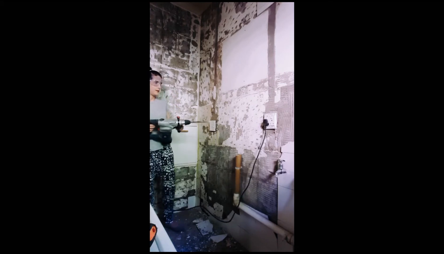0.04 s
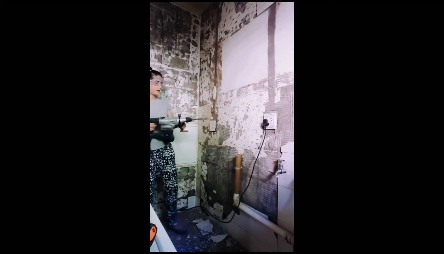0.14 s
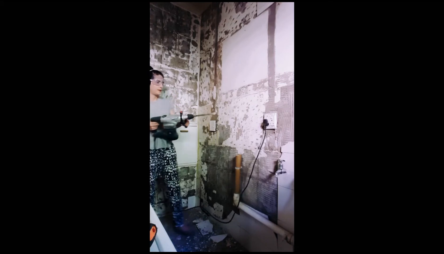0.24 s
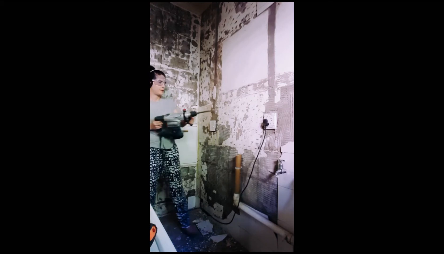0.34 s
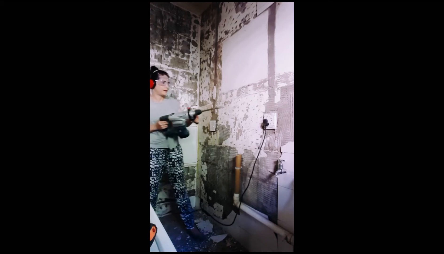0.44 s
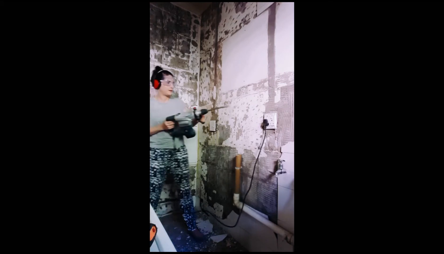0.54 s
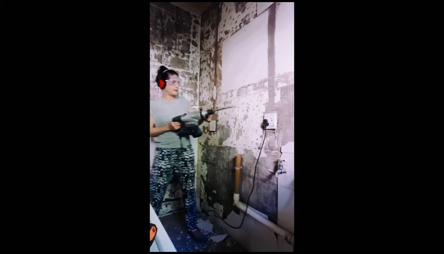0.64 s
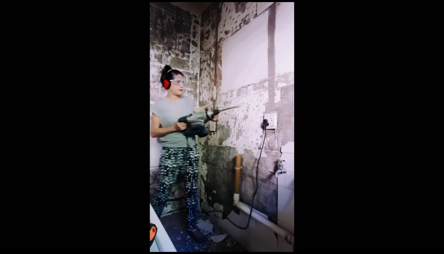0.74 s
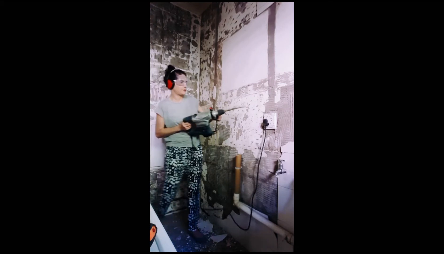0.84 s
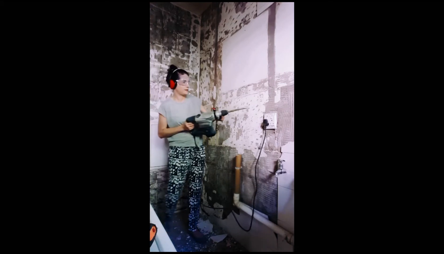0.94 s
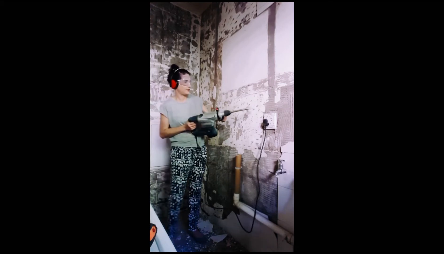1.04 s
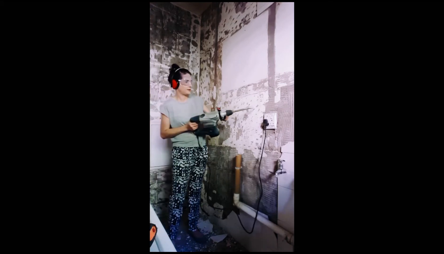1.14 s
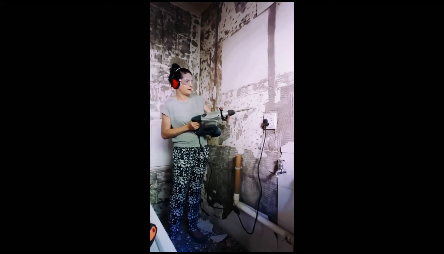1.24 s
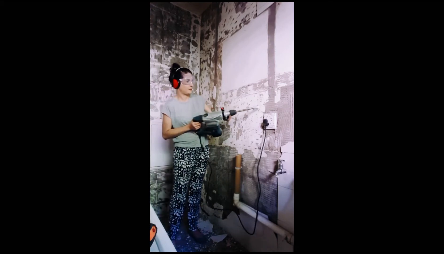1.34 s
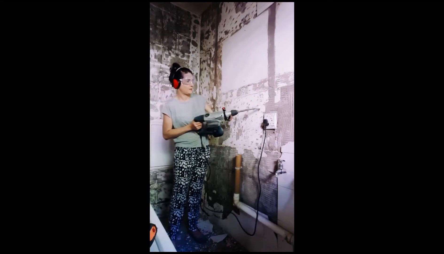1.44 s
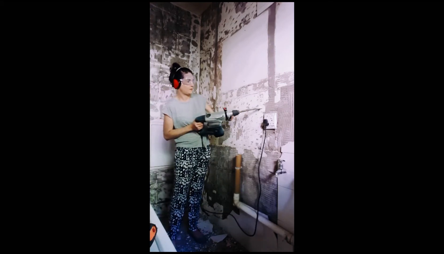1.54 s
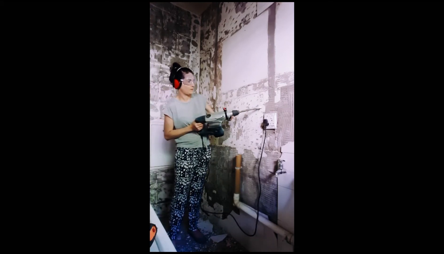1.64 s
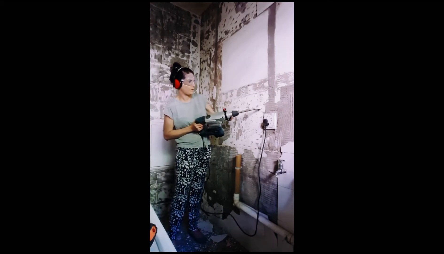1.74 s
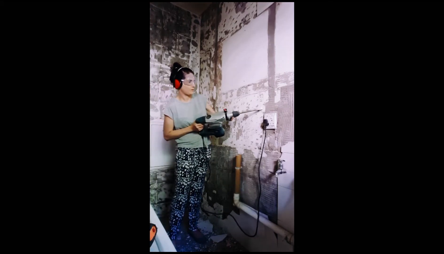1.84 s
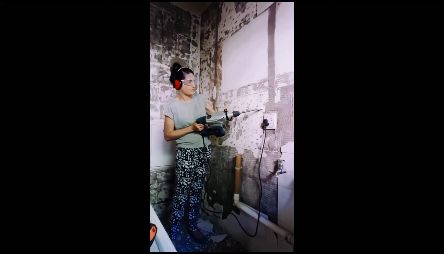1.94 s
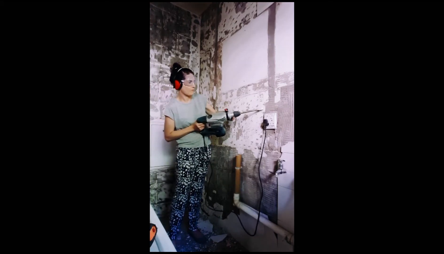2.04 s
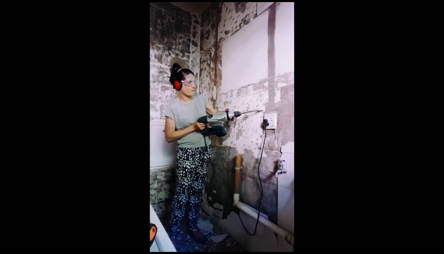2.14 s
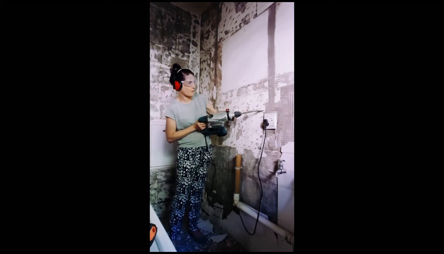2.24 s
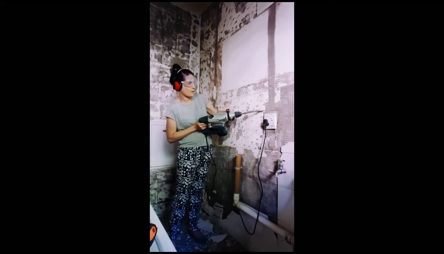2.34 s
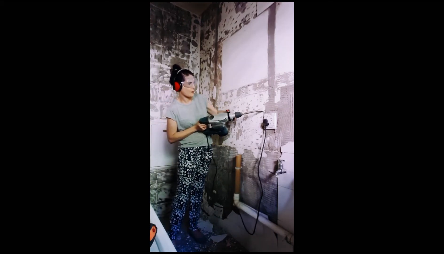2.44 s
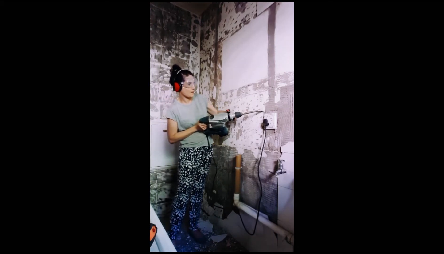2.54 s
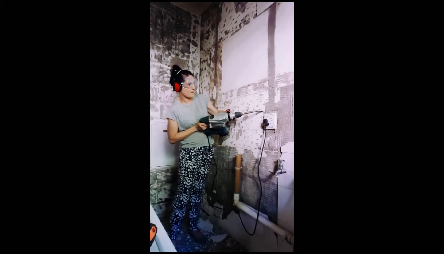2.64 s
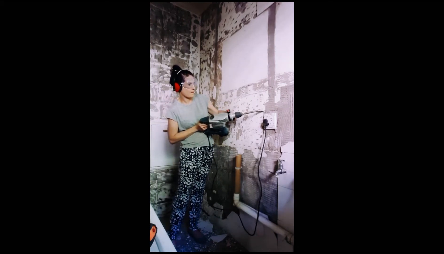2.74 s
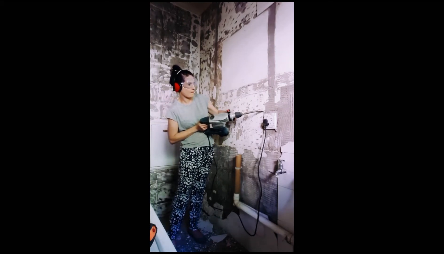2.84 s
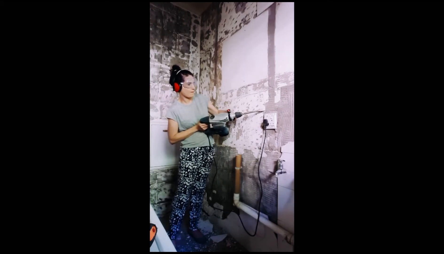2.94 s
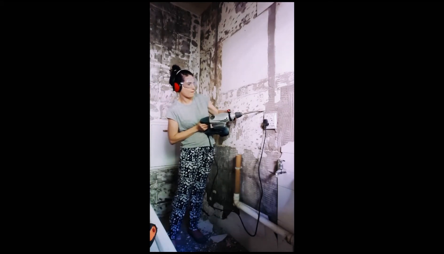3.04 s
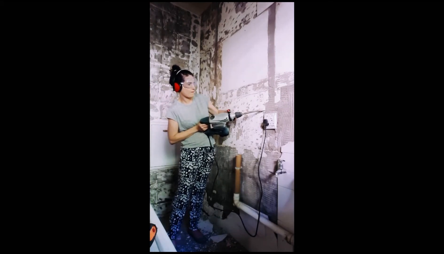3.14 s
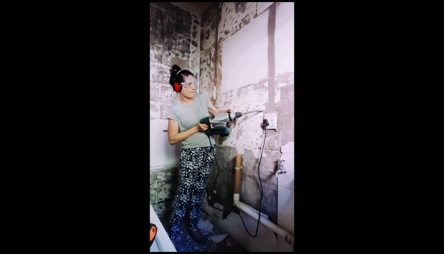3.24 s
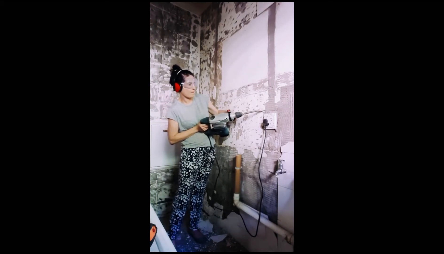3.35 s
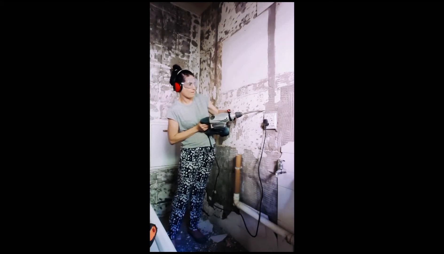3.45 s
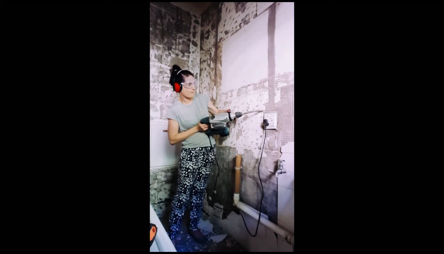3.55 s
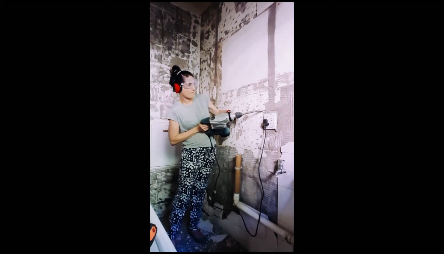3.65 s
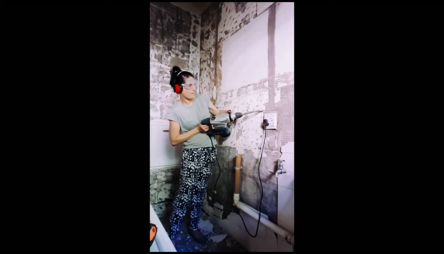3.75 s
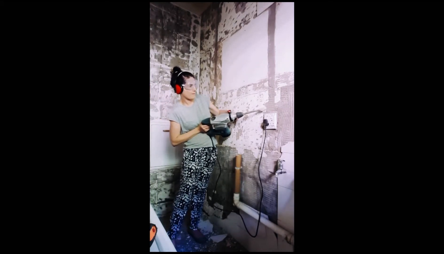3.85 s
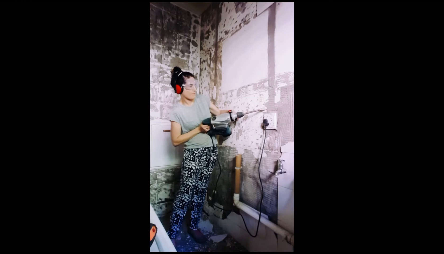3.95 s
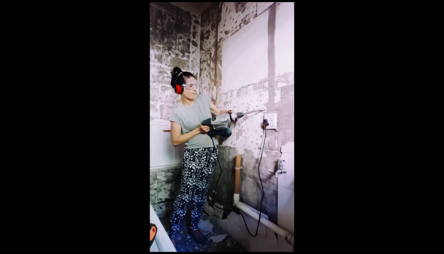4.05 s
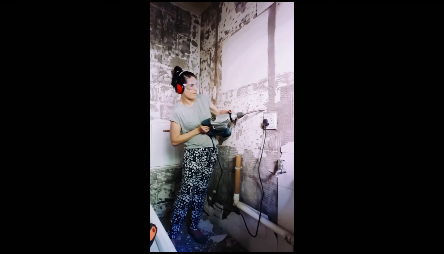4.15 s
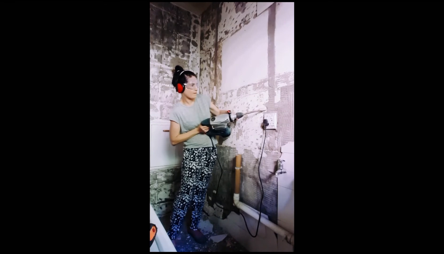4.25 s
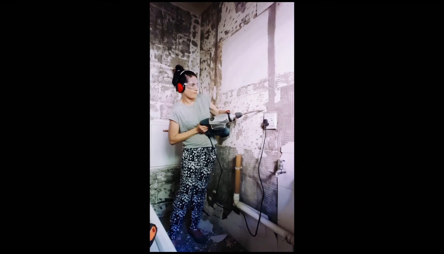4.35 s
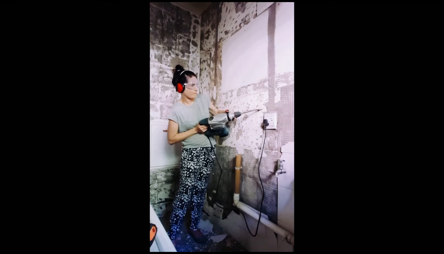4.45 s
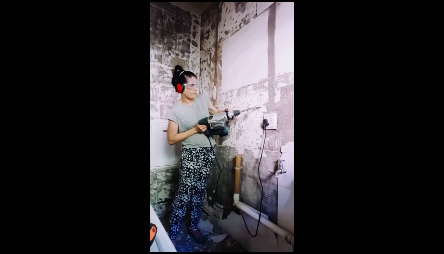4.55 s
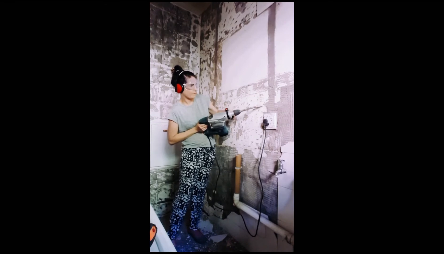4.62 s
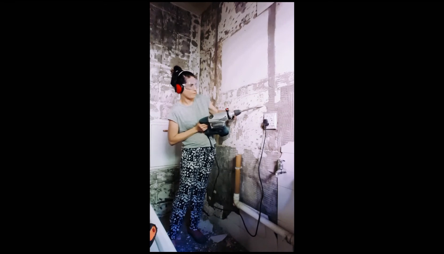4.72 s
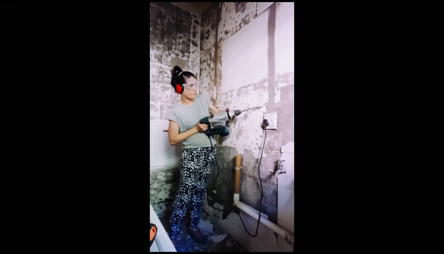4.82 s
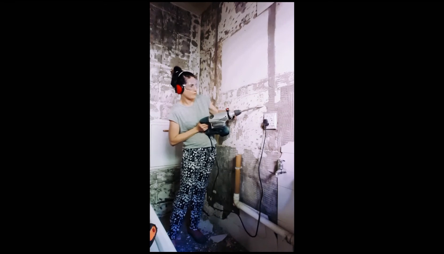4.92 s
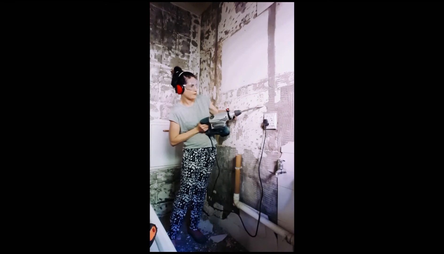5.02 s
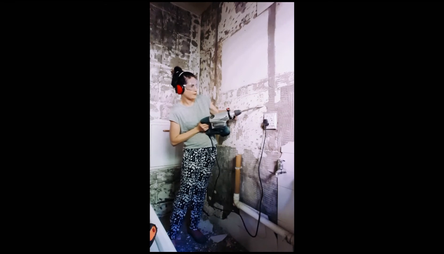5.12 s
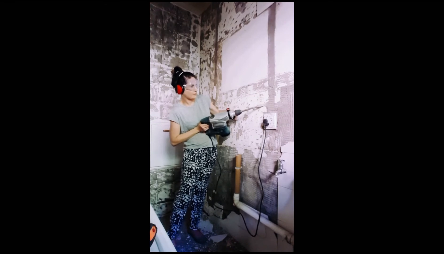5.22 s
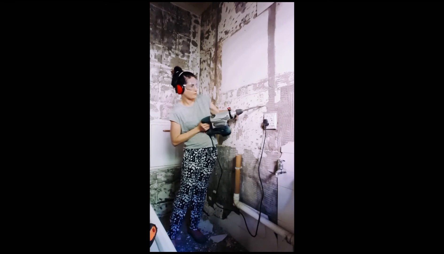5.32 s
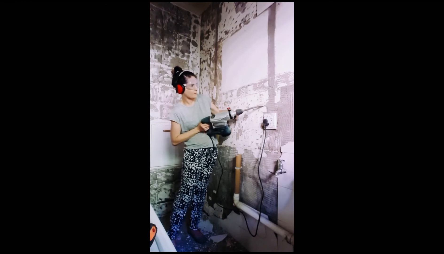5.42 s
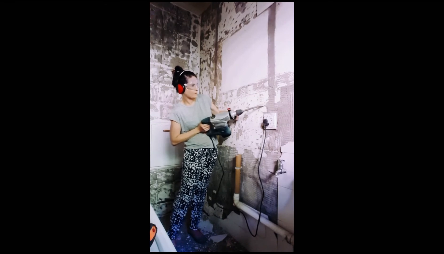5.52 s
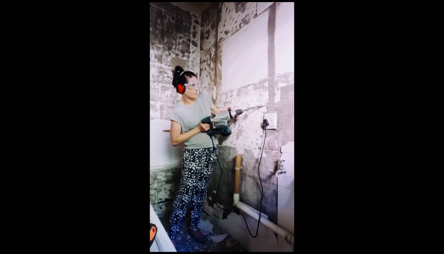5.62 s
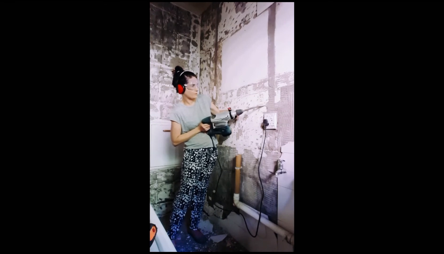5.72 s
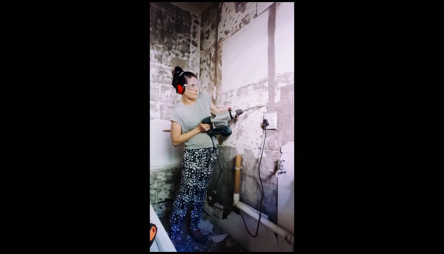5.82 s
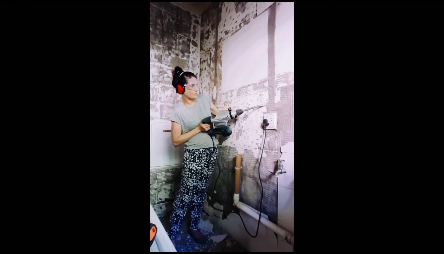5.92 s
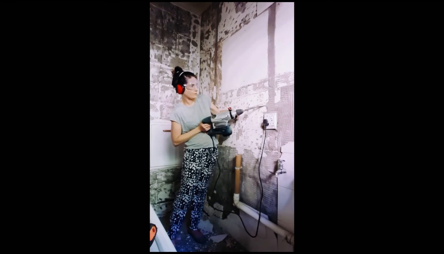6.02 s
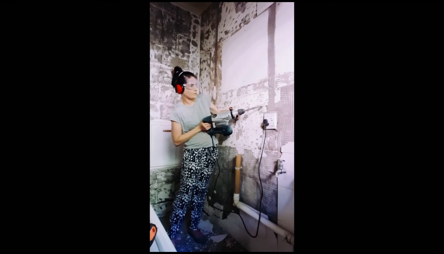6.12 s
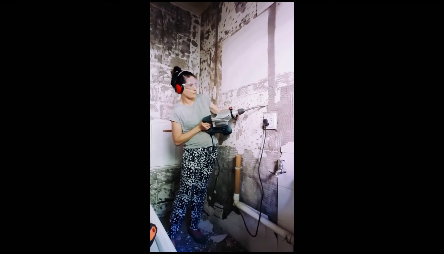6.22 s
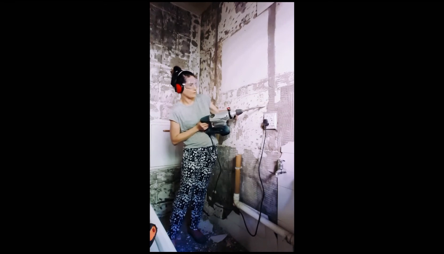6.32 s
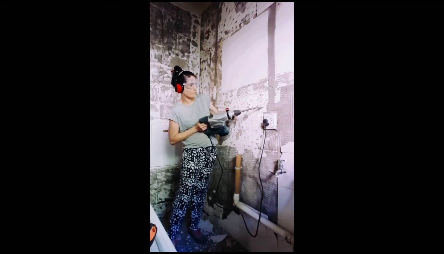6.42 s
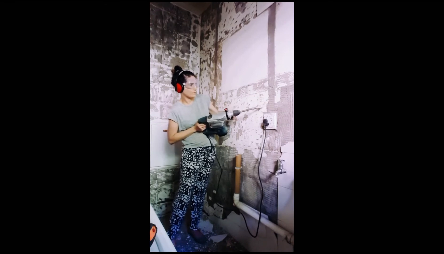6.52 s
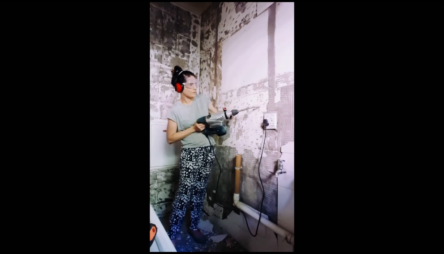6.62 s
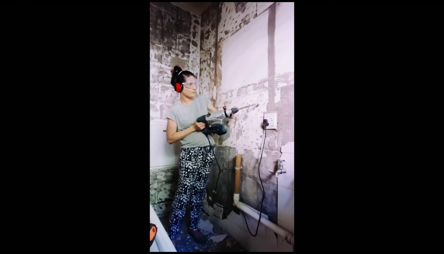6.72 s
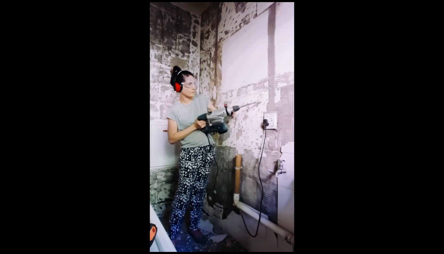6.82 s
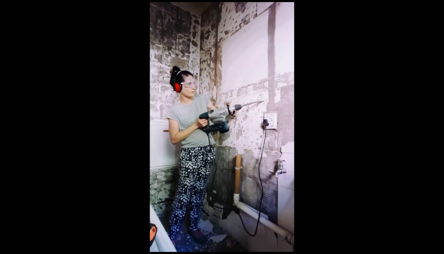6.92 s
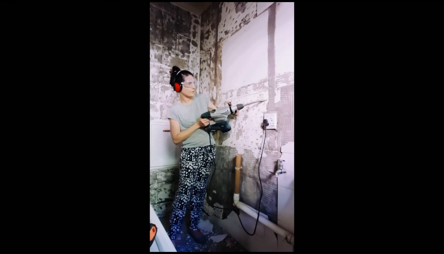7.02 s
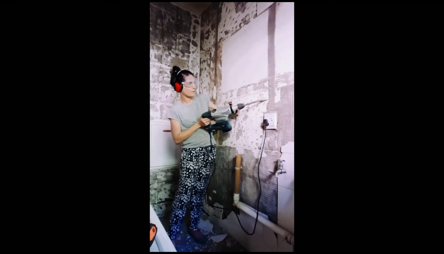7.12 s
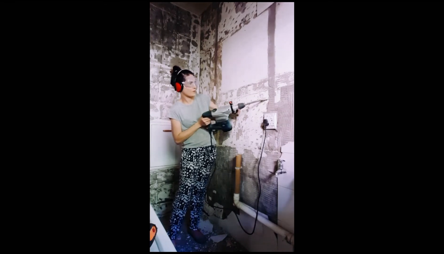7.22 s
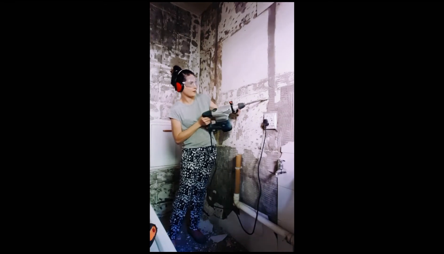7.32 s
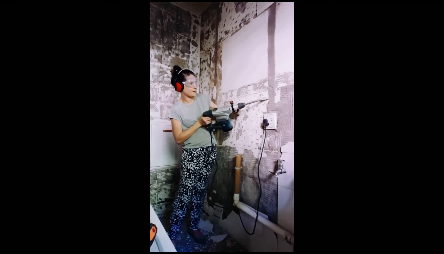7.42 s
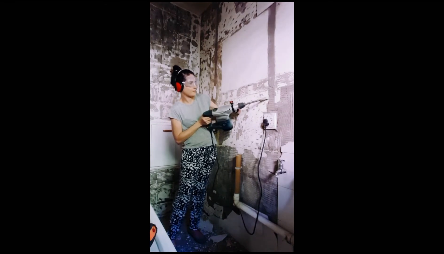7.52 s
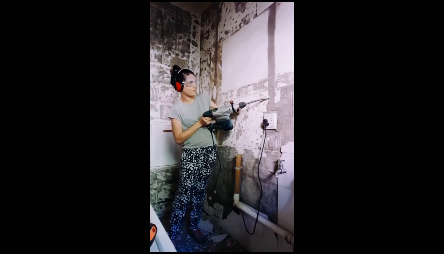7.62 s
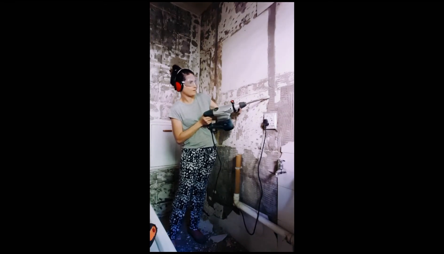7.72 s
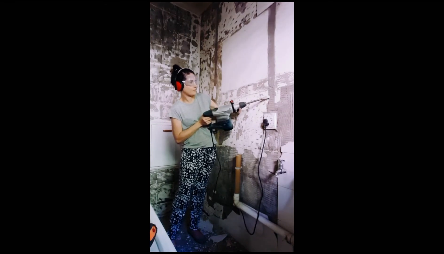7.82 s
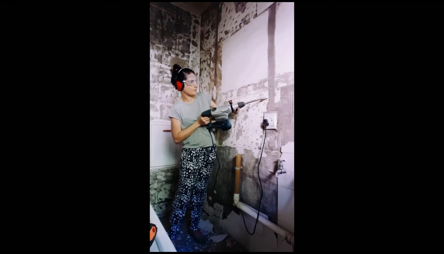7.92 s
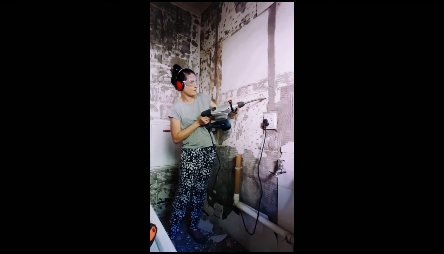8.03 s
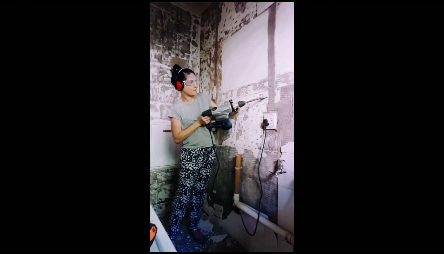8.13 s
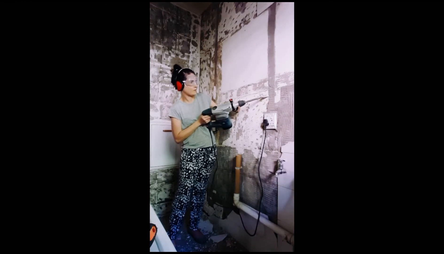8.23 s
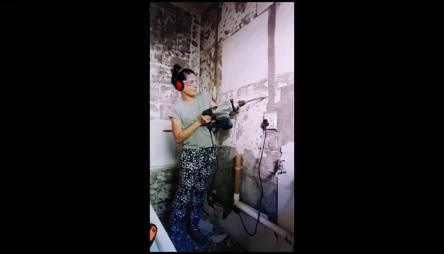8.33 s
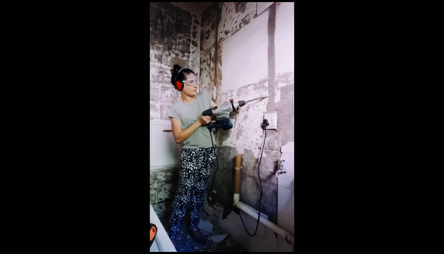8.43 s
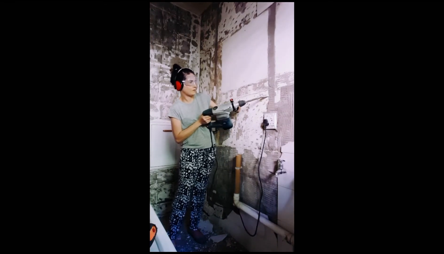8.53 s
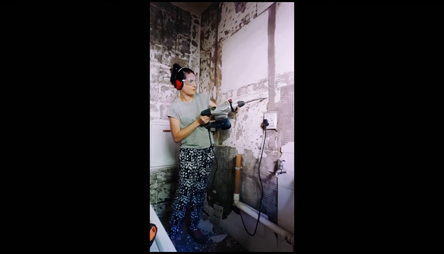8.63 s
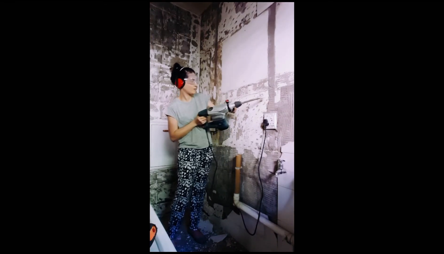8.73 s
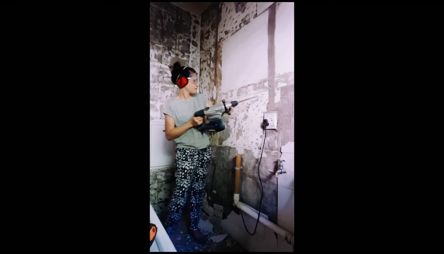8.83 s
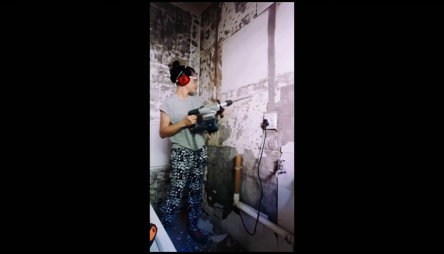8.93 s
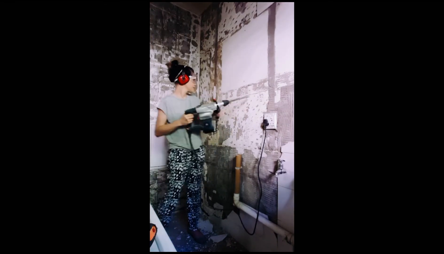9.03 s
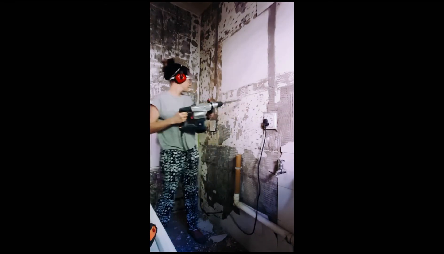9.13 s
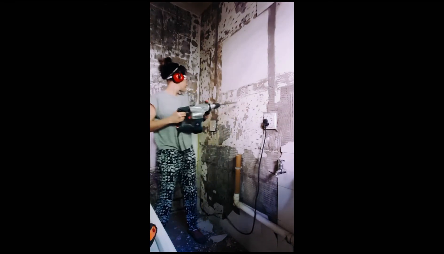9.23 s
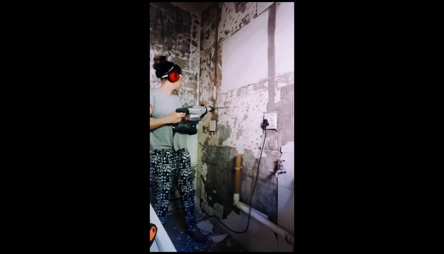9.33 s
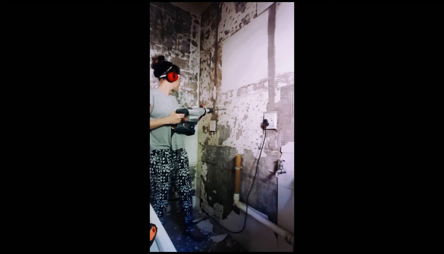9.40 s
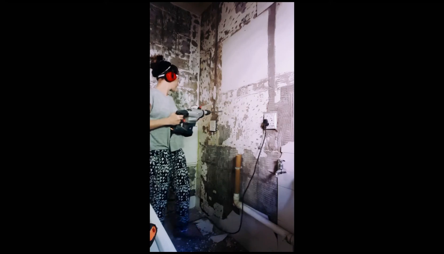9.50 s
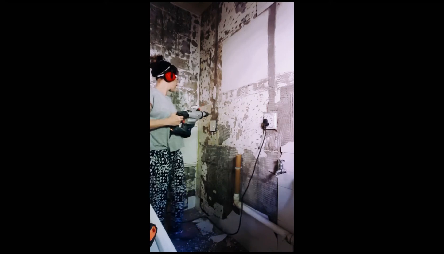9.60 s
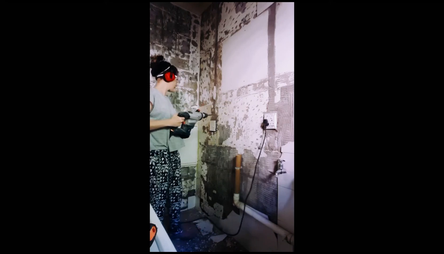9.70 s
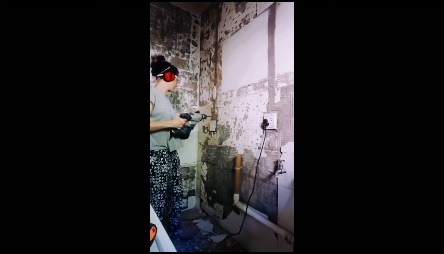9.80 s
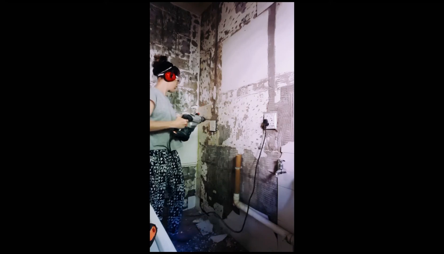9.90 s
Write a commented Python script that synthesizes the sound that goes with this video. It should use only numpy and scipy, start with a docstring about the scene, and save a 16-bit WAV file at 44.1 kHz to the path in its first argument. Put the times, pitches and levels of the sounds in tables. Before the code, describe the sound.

A small, hard-walled room. A hammer drill's gears rattle out quietly for a second with faint casing knocks, then the trigger clicks, a kick and short rising squeal follow, and the motor climbs to full speed. A loud rough airy roar with a very high, wavering whine and metallic chatter continues to the end. From about three seconds, brief bursts of rapid hammering chip at the wall. Close stereo microphone, slightly heavier on the right.

```python
"""A small bare room: a hammer drill coasts down, is switched on again and runs up to full speed.
Its fan and brushes are filtered noise that grows with speed; the fan whines at 18 blades a turn.
The armature hums through the wall (sines of the shaft phase) while the tool leans on it. The loose chuck
and gears rattle as dense ticks, and the piston knocks in short spells when the chisel bites into
the tile adhesive. Casing knocks and a rising gear squeal mark the start."""
import sys
import numpy as np
from scipy import signal
from scipy.fft import rfft, irfft, next_fast_len
from scipy.io import wavfile
from scipy.ndimage import uniform_filter1d, map_coordinates

SR = 44100
rng = np.random.default_rng(int(sys.argv[2]) if len(sys.argv) > 2 else 0)


def generate_wav(sig):
    """Save sig (samples, or channels by samples) to the path in sys.argv[1] as 16-bit PCM at SR."""
    pcm = np.round(np.clip(np.atleast_2d(sig).T, -1, 1) * 32767).astype(np.int16)
    wavfile.write(sys.argv[1], SR, pcm)


N = 439236
TIME_S = np.arange(N) / SR
SIDES = np.array([[1], [-1]]) / 2  # splits a left-minus-right value over the two channels

GEARING = 5 / 28  # piston strokes per armature turn
FULL_TURNS_PER_S = 392.4  # armature, unloaded
ON_S, SURGE_S = 0.996, 1.06  # trigger pulled; a surge of noise


def amp(db):
    """Decibels to gain."""
    return 10 ** (np.asarray(db) / 20)


def unit(x):
    """Scale to rms 1."""
    return x / np.sqrt(np.mean(x ** 2) + 1e-20)


def along(points, hz):
    """Read (Hz, value) points on a log frequency axis."""
    f, v = np.transpose(points)
    return np.interp(np.log(hz + 1), np.log(f + 1), v)


def curves(rows):
    """One value per sample for each column after the time."""
    s, *cols = np.transpose(rows)
    return [np.interp(TIME_S, s, c) for c in cols]


def wobble(knots_per_s):
    """A smooth random curve."""
    knots = rng.standard_normal(int(N * knots_per_s / SR) + 4)
    return map_coordinates(knots, [np.arange(N) * knots_per_s / SR])


def since(s):
    """Seconds since a moment, 0 before it."""
    return np.maximum(TIME_S - s, 0)


def filtered(x, response):
    """Multiply the spectrum of x by a response of frequency."""
    size = next_fast_len(N + SR // 2)
    return irfft(rfft(x, size) * response(np.fft.rfftfreq(size, 1 / SR)), size)[..., :N]


def smoothed_noise(shape, bins, frames):
    """Random spectrogram field of rms 1, averaged over bins and frames."""
    field = uniform_filter1d(rng.standard_normal(shape), size=bins, axis=0)
    return unit(uniform_filter1d(field, size=frames, axis=1))


def rush(spectrum, patchy_db, gate=1, ribs_db=3.0):
    """Stereo noise of rms 1, gated, with fleeting patches and slowly shifting ribs: standing waves."""
    # Each row: frequency in Hz, left-right correlation.
    alike = [(60, 0.2), (150, 0.72), (340, 0.83), (800, 0.66), (1250, 0.18), (1800, -0.34), (2400, 0.42),
             (3500, 0.063), (6000, 0.18), (9000, 0.00016)]
    z = signal.stft(rng.standard_normal((2, N)), nperseg=2048)[2]
    patches = smoothed_noise(z.shape[1:], bins=4, frames=4)
    ribs = smoothed_noise(z.shape[1:], bins=2, frames=40)
    pair = signal.istft(z * amp(patchy_db * patches + ribs_db * ribs), nperseg=2048)[1][:, :N] * gate

    def mid_side(hz):
        angle = np.arccos(np.clip(along(alike, hz), -1, 1)) / 2
        return amp(along(spectrum, hz)) * np.array([np.cos(angle), np.sin(angle)])

    mid, side = filtered(pair, mid_side)
    return unit(np.array([mid + side, mid - side]))


def room(x):
    """The bare walls' answer on each side: noise that decays at its own rate in each band."""
    # Each row: frequency in Hz, t60 in seconds.
    decay = [(150, 0.13), (1000, 0.48), (5000, 0.49), (12000, 0.039)]
    hz, t, z = signal.stft(rng.standard_normal((2, SR // 2)), SR, nperseg=256)
    tail = signal.istft(z * amp(-60 * t / along(decay, hz)[:, None]), SR, nperseg=256)[1]
    return signal.fftconvolve(np.atleast_2d(x), tail / np.linalg.norm(tail[0]), axes=1)[:, :N]


def power(rise_s):
    """0 before the trigger, ramping to 1 as the current flows."""
    return np.clip((TIME_S - ON_S) / rise_s, 0, 1)


def motor_speed():
    """Turns a second under power: a quick jerk, a slower approach to full speed, a slight sag under load."""
    # Speed lost to the load. Each row: time in seconds, loss in turns/s.
    sag = [(3, 0), (3.7, 2.1), (4.8, 1.2), (6.2, 3.5), (7.4, 2.8), (8.8, 5.2), (9.96, 3.1)]
    jerk_s, settle_s, jerk_share = 0.074, 0.296, 0.525  # time constants; share of the fast one
    t = since(ON_S)
    lacking = jerk_share * np.exp(-t / jerk_s) + (1 - jerk_share) * np.exp(-t / settle_s)
    return FULL_TURNS_PER_S * (1 - lacking) - curves(sag)[0]


def coasting():
    """The gears rattle out, growing quieter and duller until the motor takes over."""
    # Each row: time in seconds, relative rattle level in dB, relative hiss level in dB.
    run_out = [(0.0, -28, -33.5), (0.48, -34, -41.5), (0.84, -39, -47.5), (0.98, -42, -49)]
    # Spectra. Each row: frequency in Hz, density in dB.
    rattle_spectrum = [(30, -24), (80, -21), (230, -22), (340, -13), (500, -7.5), (750, 0), (1050, -3),
                       (2100, 0), (2900, -5.5), (3300, -14), (6000, -27), (12000, -41)]
    hiss_spectrum = [(1500, -22), (3600, 3), (5200, -2.5), (7000, -11.5), (10000, -15), (13000, -35)]
    rattle_db, hiss_db = curves(run_out)
    clatter = amp(0.62 * wobble(260))
    gears = amp(rattle_db + 5.0) * rush(rattle_spectrum, patchy_db=1.5, gate=clatter, ribs_db=1.3)
    hiss = amp(hiss_db + 3.5) * rush(hiss_spectrum, patchy_db=3.0, gate=clatter)
    return (gears + hiss) * (1 - power(rise_s=0.054))


def background():
    """The room's own steady, low-heavy noise."""
    # Each row: frequency in Hz, density in dB.
    floor_spectrum = [(25, -9), (120, -5), (400, -4), (10000, -41)]
    return amp(-58) * rush(floor_spectrum, patchy_db=2.5)


def squeal():
    """A faint gear tone flares into a short rising squeal as the motor jerks, with a weaker echo off the walls."""
    # Each row: time in seconds, pitch in Hz, level in dB (the last row's gain is subtracted).
    glide = [(1.055, 2133, -47), (1.072, 2173, -15), (1.1, 2280, -20), (1.125, 2480, -21),
             (1.175, 2980, -20), (1.21, 3050, -60)]
    hz, db = curves(glide)
    stutter = amp(3.4 * wobble(120).clip(-3, 1))
    phase = 2 * np.pi * np.cumsum(hz * (1 + 0.025 * wobble(350))) / SR
    tone = (amp(db) - amp(db[-1])) * stutter * np.sin(phase)
    return tone + amp(-4.0) * room(tone)


def knocks():
    """Hand, trigger and the kick of the starting motor knock the casing: damped modes plus a noise crack."""
    # Each row: time in seconds, relative level in dB.
    blows = [(0.741, -40), (0.997, -36.5), (1.072, -27)]
    # Casing modes. Each row: frequency in Hz, mean level in dB, t60 in seconds.
    modes = [(790, 0, 0.094), (2190, 1, 0.16), (2730, 0, .08)]
    out, t = np.zeros(N + SR), np.arange(SR // 2) / SR
    for s, db in blows:
        ring = 0
        for hz, level_db, t60_s in modes:
            mode_db = level_db + rng.normal(0, 2.2)
            ring = ring + amp(mode_db - 60 * t / t60_s) * np.sin(2 * np.pi * hz * t)
        crack = 0.45 * amp(-60 * t / 0.025) * np.diff(rng.standard_normal(len(t)), prepend=0)
        onset = 1 - np.exp(-t / 0.001)
        out[round(s * SR):][:len(t)] += amp(db + 5.0) * (ring + crack) * onset
    return out[:N] + room(out[:N])


def grit():
    """Roughness of the roar: a gain that jumps at random moments and dies away quickly."""
    jumps_per_s, fade_s, power_size = 170, 0.003, 0.42
    jumps = (rng.random(N) < jumps_per_s / SR) * rng.exponential(size=N)
    surges = signal.lfilter([1], [1, -np.exp(-1 / (fade_s * SR))], jumps)
    return np.sqrt(1 + power_size * surges)


def air(turns, pace):
    """The fan blows through the vents, the brushes scrape once a turn, both louder with speed; bass flutters."""
    # Spectra. Each row: frequency in Hz, density in dB.
    fan_spectrum = [(60, -60), (170, -54), (265, -20), (400, -2.5), (530, -8.5), (800, -3.5), (1100, -3.5),
                    (1550, 0), (2400, 0), (3300, -2.5), (4800, -8), (6000, -5.5), (7200, -16.5),
                    (13000, -32)]
    brush_spectrum = [(1500, -54), (3500, 3.5), (5800, 2), (7400, 0), (8600, 3.5), (11000, -0.5),
                      (13000, -7.5)]
    flutter_spectrum = [(40, -42), (80, -33), (150, -14), (230, 9), (290, 8.5), (420, -17.5)]
    # Slow drift. Each row: time in seconds, roar change in dB, treble change in dB.
    drift = [(1.4, 0, 0), (2.2, 0, 0), (4.74, -0.85, -1.2), (5.1, 1, 1.5), (6.45, -1, -.5), (6.8, 1.2, 2),
             (7.3, -2.7, -1), (8.2, -0.7, 1), (9.05, .8, 1.5), (9.37, -1, 0.4), (9.96, -1, -1.5)]
    # Bass flutter, which drops out for moments. Each row: time in seconds, level in dB.
    bass = [(1.15, -39), (1.35, -58), (1.9, -47), (3.07, -45), (3.17, -68), (3.25, -44), (4.05, -40),
            (4.25, -72), (4.55, -44.5), (6.3, -42), (7.3, -45.5), (8.74, -40), (8.83, -66), (8.92, -42),
            (9.45, -46.5), (9.62, -64)]
    # Vent hiss dulls and brightens as the tool shifts. Each row: time in seconds, gain in dB.
    vents = [(4.65, 2), (4.8, -1), (5.25, -2), (5.58, 3.5), (5.87, 1), (6.4, 2), (6.7, -2), (6.95, 1.5),
             (7.7, 2.5), (8.0, 0), (8.85, -2.5), (9.15, -0.5), (9.5, 3.5)]
    # A surge of noise soon after the trigger
    kick_db = 5 * np.minimum(since(SURGE_S) / 0.022, 1) * np.exp(-since(SURGE_S) / 0.15)
    roar_db, treble_db = curves(drift)
    fan_db = -16 - 3.5 * (1 - pace ** 6.7) + kick_db + roar_db
    brush_db = -20.5 - 18.5 * (1 - pace ** 2.1) + 1.5 * kick_db + treble_db
    rough = grit()
    fan = amp(fan_db) * rush(fan_spectrum, patchy_db=1.2, gate=rough, ribs_db=1.1)
    scrape = amp(0.4 * np.sin(2 * np.pi * turns)) * rough
    brush_gain = amp(brush_db + 0.39 * wobble(11))
    brushes = brush_gain * rush(brush_spectrum, patchy_db=3.0, gate=scrape, ribs_db=1.8)
    flutter_gain = amp(curves(bass)[0] + 3.3 * wobble(20).clip(-3, 1))
    flutter = flutter_gain * rush(flutter_spectrum, patchy_db=3)

    hiss = filtered(fan + brushes, lambda hz: np.exp(-np.log((hz + 1) / 5100) ** 2 / 0.11))
    body = filtered(fan, lambda hz: np.exp(-np.log((hz + 1) / 704) ** 2 / 0.5))
    hiss_change = amp(curves(vents)[0]) - 1
    body_change = amp(0.34 * (TIME_S - 3.9)) - 1  # low middle fills out slowly, in dB/s, as the work goes on
    roar = fan + brushes + hiss_change * hiss + body_change * body
    return (roar + flutter) * power(rise_s=0.026)


def contact(swell_s):
    """Tool against the wall: rises toward 1 after the touch, falls to 0 as it is lifted off."""
    touch_s, clear_s, lift_s = 1.6, 9.48, 0.18
    return (1 - np.exp(-since(touch_s) / swell_s)) * np.clip((clear_s - TIME_S) / lift_s, 0, 1)


def hum(turns):
    """Armature unbalance sings once and twice a turn, louder with force on the wall; faint gear tones above."""
    # How hard the tool is leant on. Each row: time in seconds, force in dB.
    force = [(1.7, 0.5), (2.9, -7.5), (3.4, -4.5), (5.8, 0.4), (7.1, -1), (8.5, 2), (9.3, -8)]
    # Each row: multiple of the speed, free-air level in dB, wall level in dB, dB per dB of force,
    # level waver in dB, phase waver in rad, swell in seconds.
    hum_tones = [(1, -52, -27.7, 0.35, 1.3, .22, .06), (2, -52, -28.3, 1.2, 2, 0.45, .8)]
    # Shaft and gear tones. Each row: multiple of the speed, level in dB.
    gear_tones = [(4, -36.5), (26 * GEARING, -37.5)]
    force_db, phase = curves(force)[0], 2 * np.pi * turns
    tones = 0
    for order, free_db, wall_db, slope, waver_db, waver_rad, swell_s in hum_tones:
        level = amp(free_db) + contact(swell_s) * amp(wall_db + slope * force_db)
        level = level * amp(waver_db * wobble(21))
        drift_rad = waver_rad * np.array([wobble(21), wobble(19)])
        tones = tones + level * np.sin(order * phase + drift_rad)
    for order, db in gear_tones:
        level = amp(db + 2.2 * wobble(5.7))
        drift_rad = 1.1 * np.array([wobble(5.8), wobble(6.4)])
        tones = tones + level * np.sin(order * phase + drift_rad)
    return tones * power(rise_s=0.61)


def chatter(turns, pace):
    """Loose chuck and gears rattle through each stroke: dense ticks, each with its own moment, pitch, size."""
    ticks_per_stroke, tick_t60_s = 12, 0.01
    middle_hz, log_spread, scatter_db = 3206, 0.497, 4.5
    strokes = np.repeat(np.flatnonzero(np.diff(np.floor(turns * GEARING))), ticks_per_stroke)
    pitch, size, side = rng.standard_normal((len(strokes), 3)).T
    late_s = rng.random(len(strokes)) / (FULL_TURNS_PER_S * GEARING)
    t = np.arange(SR // 60) / SR
    tick_hz = middle_hz * np.exp(log_spread * pitch.clip(-2, 2))
    tick_db = scatter_db * size.clip(-3, 2)[:, None] - 60 * t / tick_t60_s
    ticks = amp(tick_db) * np.sin(2 * np.pi * tick_hz[:, None] * t)
    where = ((strokes + late_s * SR).astype(int)[:, None] + np.arange(len(t))).ravel()
    channels = []
    for turn in (-np.pi / 4, np.pi / 4):
        panned = ticks * np.cos(side + turn)[:, None]
        channels.append(np.bincount(where, panned.ravel(), N)[:N])
    # The ticks are kept above about 700 Hz
    pair = filtered(np.array(channels), lambda hz: 1 - np.exp(-(hz / 694) ** 4))
    return amp(-21.5 + 1.9 * wobble(14)) * pace * unit(pair + amp(-0.5) * room(pair))


def whine(turns, pace):
    """Blade-passing tone and octave, roughened by turbulence, with its own level and phase on each side."""
    # Path through the standing waves as the tool shifts. Each row: time in seconds, relative level in dB,
    # left minus right in dB, left phase lead in rad.
    path = [(1.06, -24.5, -6.5, 19.5), (1.25, -15.5, -9, 19), (1.34, -19, -3, 18), (2.58, -23.5, -2, -.5),
            (2.72, -27.5, 0, -3), (3.2, -29, -1, -2.8), (3.44, -20, 1.5, -.7), (3.93, -21, 0, 0),
            (4.04, -22.5, -4, -3), (4.28, -26.5, -7, -1.7), (4.56, -17.5, 12, -2), (4.78, -15.5, -14, 1.5),
            (4.9, -28, -1, 1), (5.1, -18, -2, 0), (5.36, -19.5, 2, -1), (5.6, -29, 4, -3.6),
            (5.8, -22.5, 1, -4), (6.18, -21, 0, -3.1), (6.5, -20.5, 0, -3.4), (6.75, -28, -2, -3.6),
            (6.98, -22, 0, -6.4), (7.5, -19.5, 13, -2.8), (8.0, -19.5, 4, -1.6), (8.3, -19.5, -3, -3.1),
            (8.54, -28, -3, -3.7), (8.66, -20, -14, -5.3), (8.92, -19, -4, -8.2), (9.66, -21, 0.5, -20),
            (9.8, -16, 15, -19.2), (9.94, -31, 3, -18.5)]
    # Brief level jumps and dips. Each row: time in seconds, left change in dB, right change in dB.
    breaks = [(2.17, -7, -8), (8.87, -2, -17), (8.99, 8, -16), (9.38, -13, -11), (9.66, -14, 5)]
    blades, break_half_s = 18, 0.021
    level_db, lean_db, lead_rad = curves(path)
    share = amp(SIDES * (lean_db + 4.0 * wobble(16)))
    share = share / np.sqrt(np.mean(share ** 2, axis=0))
    climb = np.clip(1 - pace / 0.96, 0, 1) ** 0.5  # 1 at rest, 0 near full speed
    phase = 2 * np.pi * blades * turns + 0.21 * wobble(76)
    phase = phase + 0.9 * climb ** 2 * wobble(420)  # rougher while the motor strains up to speed
    phase = phase + SIDES * (lead_rad + 0.79 * wobble(16))
    # A climbing pitch sweeps through the standing waves and flickers
    flicker_db = (2.2 + 4 * climb) * np.array([wobble(60), wobble(68)]).clip(-2, 1.3)
    flicker_db = flicker_db + 1.9 * (1 - climb) * wobble(19).clip(-3, 1.1)
    break_db = 0
    for s, *side_db in breaks:
        break_db = break_db + np.array(side_db)[:, None] * np.exp(-((TIME_S - s) / break_half_s) ** 2)
    tone = np.sin(phase) + amp(-20) * np.sin(2 * phase + 0.8 * wobble(200))
    level = np.sqrt(2) * amp(-0.67 + level_db + flicker_db + break_db)
    direct = level * share * tone * np.minimum(since(SURGE_S) / 0.028, 1)
    echo = amp(1) * room(direct.mean(axis=0) * climb)  # trails below the climbing pitch
    return direct + echo


def hammer(turns):
    """While the chisel bites, piston strokes boom in the wall and thump; noise bursts chip the adhesive."""
    # Each row: start in seconds, length in seconds, then relative thump, wall boom and chipping levels in dB.
    spells = [(2.646, 0.4, -45, -41, -43), (3.22, 0.15, -30, -48, -19.5), (3.37, 0.14, -30.5, -39, -23.5),
              (3.778, 0.13, -34, -51, -25), (3.913, 0.13, -34.5, -46, -27), (5.293, 0.12, -32, -54, -23),
              (5.4, 0.11, -37, -36, -38), (5.87, 0.11, -50, -70, -19), (6.036, 0.12, -43, -57, -23.5),
              (6.19, 0.16, -37, -56, -32), (7.565, 0.14, -34.5, -62, -23.5), (7.718, 0.12, -34, -54, -28),
              (8.482, 0.16, -34, -72, -17.5), (8.655, .11, -36, -66, -22)]
    # Spectra. Each row: frequency in Hz, density in dB.
    boom_spectrum = [(30, -23), (60, 0), (80, 6), (115, -12), (200, -42)]
    thump_spectrum = [(70, -35), (135, -3), (200, 2.5), (300, -3), (800, -10.5), (2000, -34)]
    chip_spectrum = [(250, -29), (450, 1.5), (800, 8.5), (1500, 9), (3500, -16), (11300, -16), (12500, 9.5),
                     (13200, -9)]
    press = np.zeros((3, N))
    for start_s, length_s, *dbs in spells:
        # The chisel bites quickly, holds and lets go
        bite = np.abs(np.sin(np.pi * np.clip((TIME_S - start_s) / length_s, 0, 1))) ** 0.5
        press += amp(dbs)[:, None] * bite
    thump, boom, chip = press
    strokes = turns * GEARING + 0.052 * wobble(40)  # the free-flying striker lands a little early or late
    hits = np.diff(np.floor(np.maximum.accumulate(strokes)), prepend=0) * amp(2.9 * wobble(60))
    hits = hits + amp(-5.5) * room(hits)

    def blows(spectrum):
        struck = unit(filtered(hits, lambda hz: amp(along(spectrum, hz))))
        return 0.68 * struck + 0.51 * rush(spectrum, patchy_db=3.5)

    chips = rush(chip_spectrum, patchy_db=1.5, gate=amp(-8 * (strokes % 1)))  # fades 8 dB over a stroke
    low = amp(-4) * boom * blows(boom_spectrum) + amp(0.5) * thump * blows(thump_spectrum)
    return low * amp(2.55 * wobble(22)) + amp(-0.5) * chip * chips


def bumps():
    """Lone blows of the chisel land in the wall: dull, quickly damped thuds of two modes."""
    # Each row: time in seconds, pitch in Hz, level in dB.
    thuds = [(2.8, 135, -35), (3.43, 70, -33), (3.805, 134, -31), (3.966, 134, -30), (6.077, 125, -30),
             (7.79, 115, -35), (8.569, 199, -23)]
    rise_s, t60_s, upper_ratio, upper_db = 0.0052, 0.17, 1.72, -4
    out, t = np.zeros(N + SR), np.arange(SR // 4) / SR
    for s, hz, db in thuds:
        thud = np.sin(2 * np.pi * hz * t) + amp(upper_db) * np.sin(2 * np.pi * hz * upper_ratio * t)
        onset = (1 - np.exp(-t / rise_s)) ** 2
        out[round(s * SR):][:len(t)] += amp(db - 60 * t / t60_s) * thud * onset
    return out[:N]


def scene():
    """All powered parts follow one shaft; the drill's noise is slightly louder on the right."""
    # Each row: time in seconds, left minus right in dB.
    balance = [(0, -1), (3, -2.5), (4.5, -1.5), (5.5, -0.9), (9.96, -0.7)]
    speed = motor_speed()
    turns, pace = np.cumsum(speed) / SR, np.clip(speed / FULL_TURNS_PER_S, 0, 1)
    noise = coasting() + squeal() + knocks() + air(turns, pace) + chatter(turns, pace)
    drill = amp(curves(balance)[0] * SIDES) * noise + hum(turns) + hammer(turns) + bumps()
    drill[1] = np.pad(drill[1], (1, 0))[:N]  # right channel a sample later
    return drill + whine(turns, pace) + background()


def record(dry):
    """Round off the highest peaks, then cut everything from 13250 Hz up."""
    rounded = dry / (1 + np.abs(dry / 0.85) ** 8) ** (1 / 8)
    return filtered(rounded, lambda hz: hz < 13250)


dry = scene()
out = record(dry)
generate_wav(out)
```